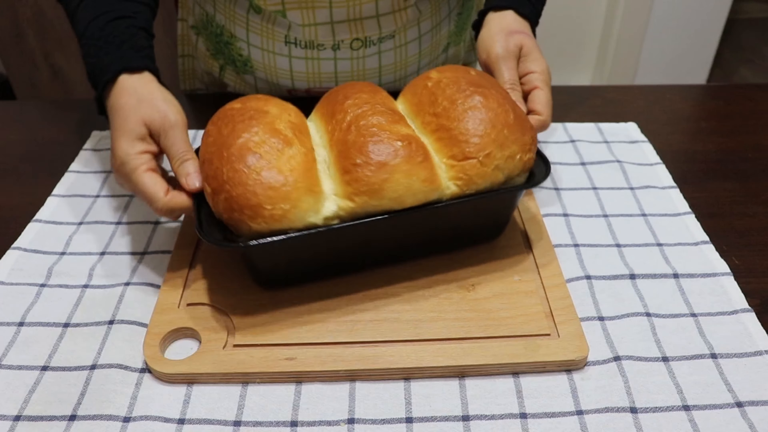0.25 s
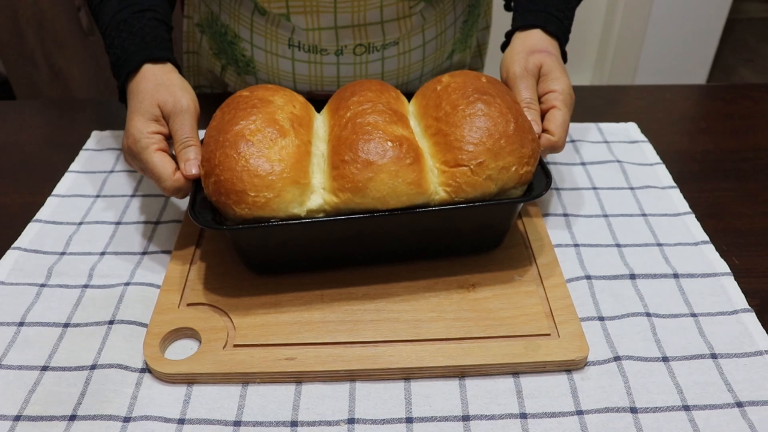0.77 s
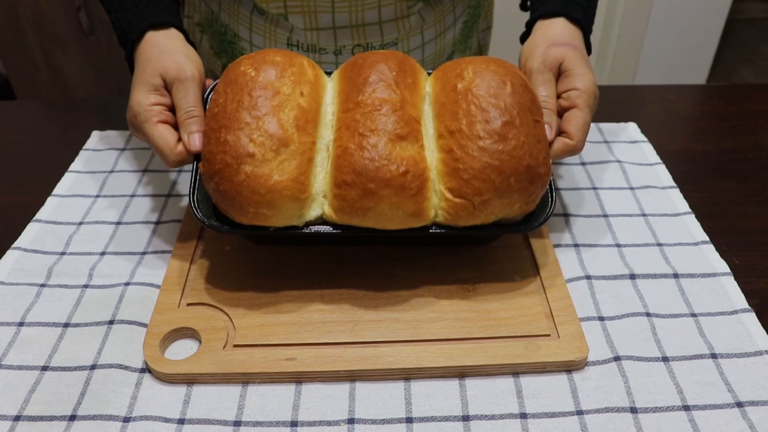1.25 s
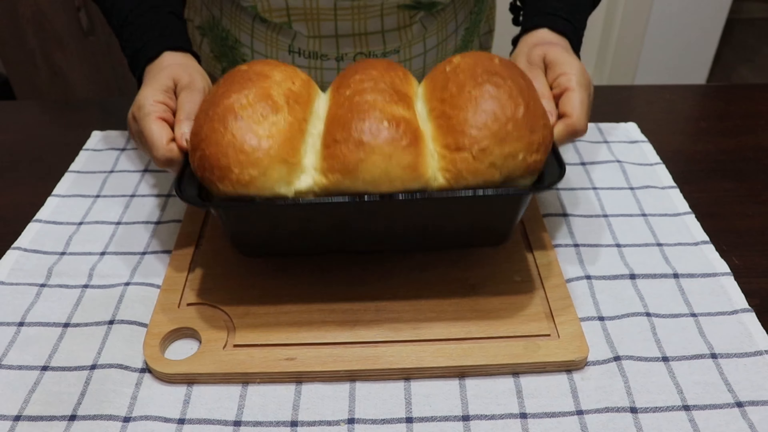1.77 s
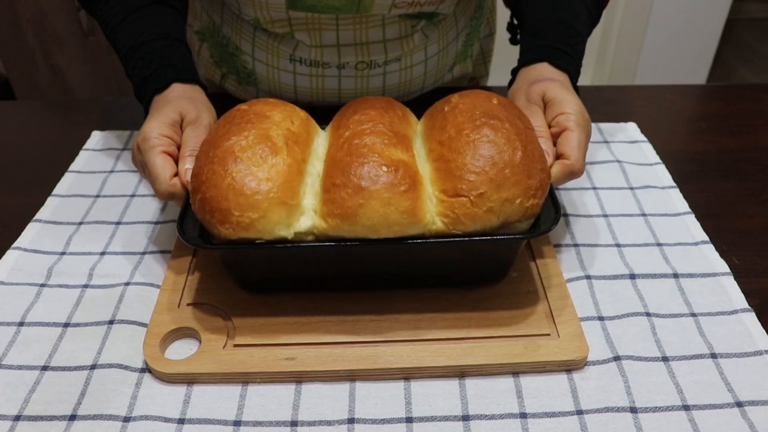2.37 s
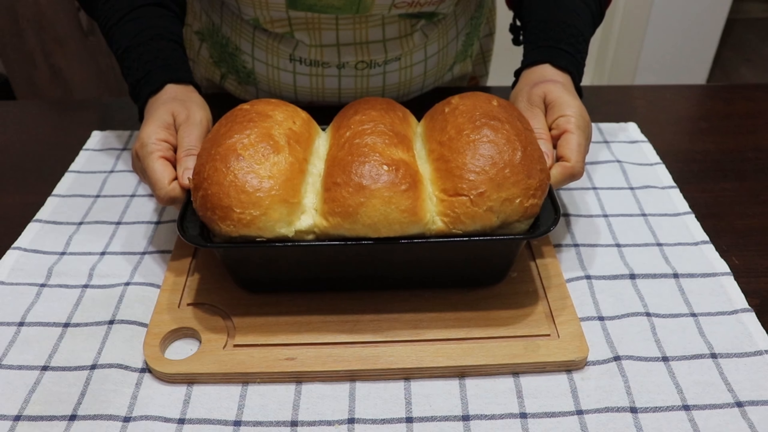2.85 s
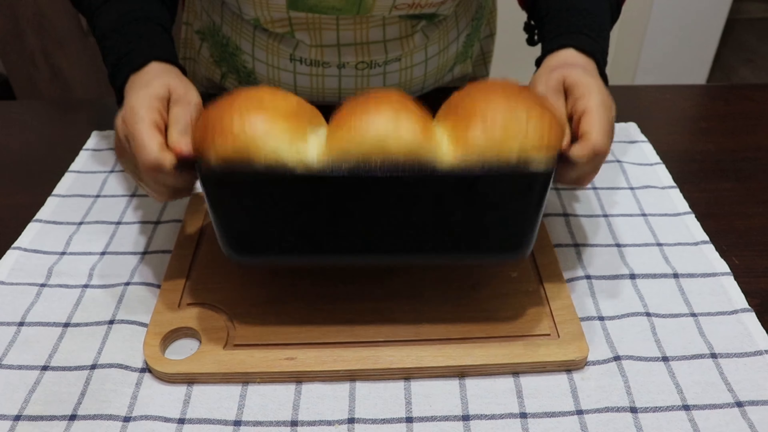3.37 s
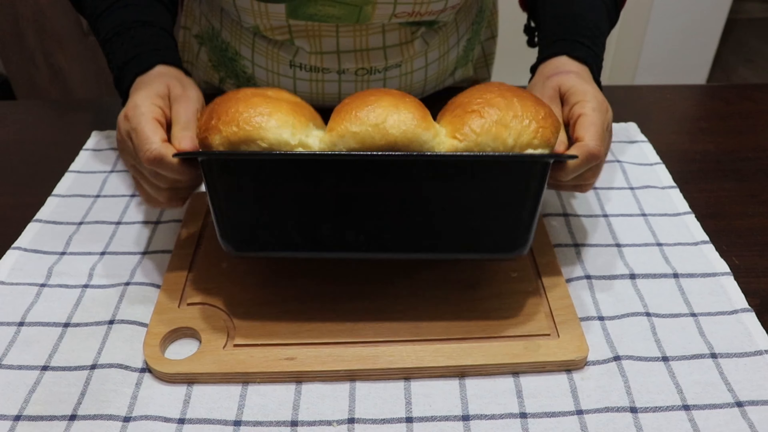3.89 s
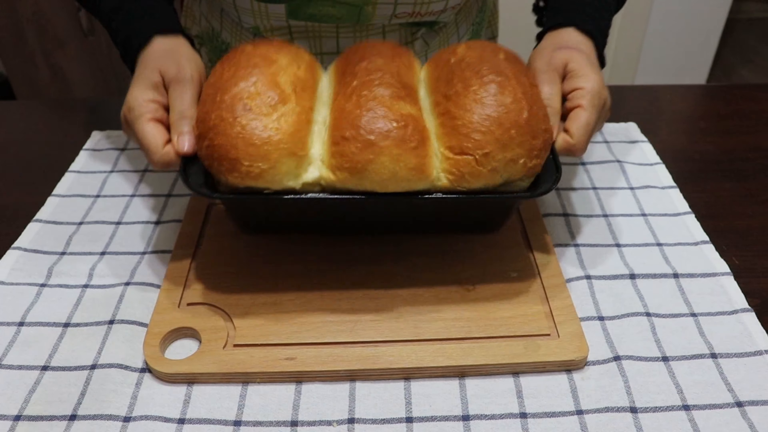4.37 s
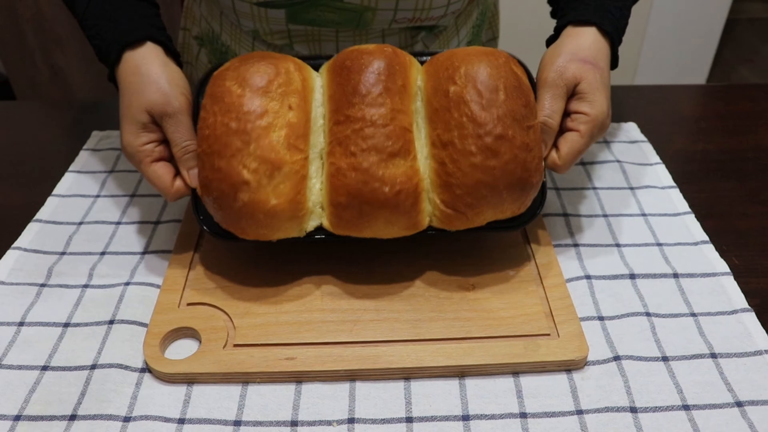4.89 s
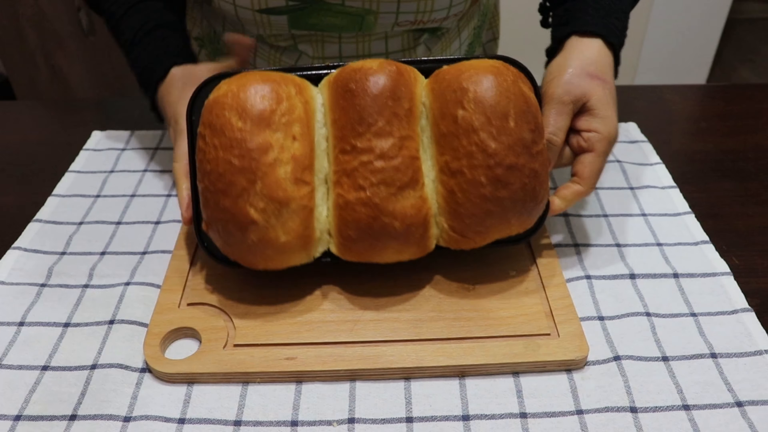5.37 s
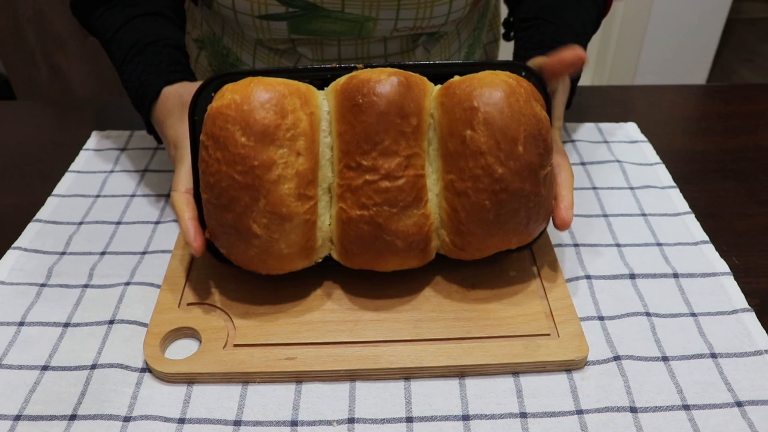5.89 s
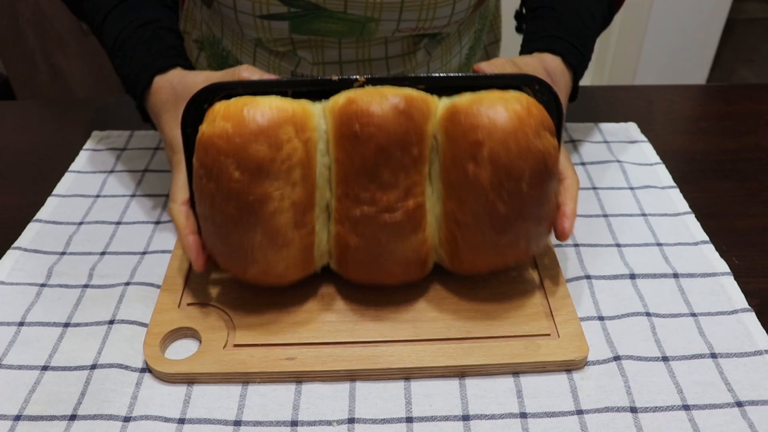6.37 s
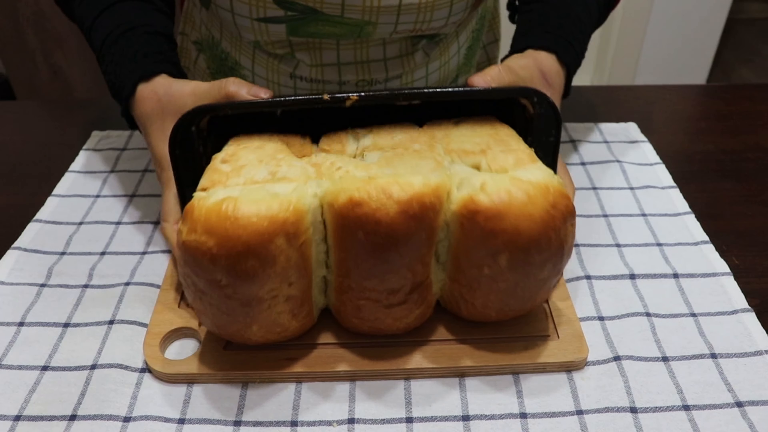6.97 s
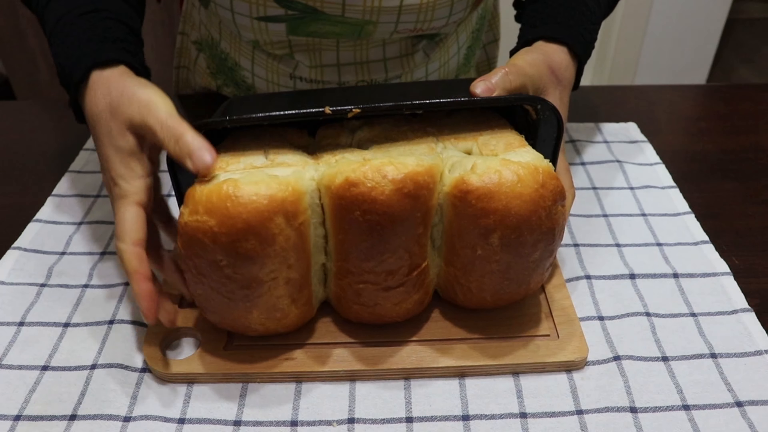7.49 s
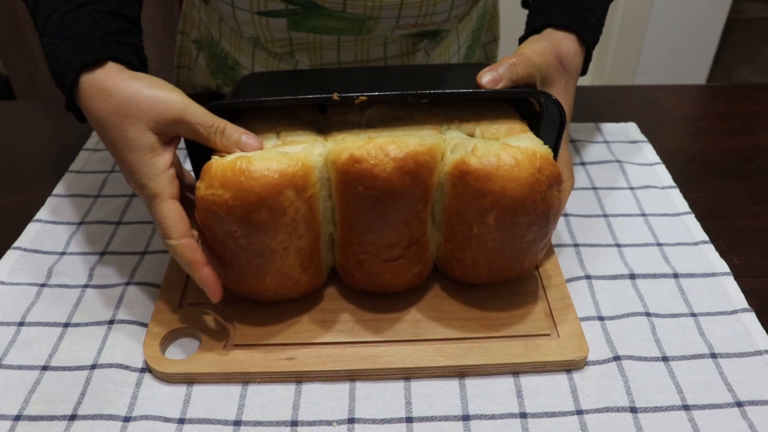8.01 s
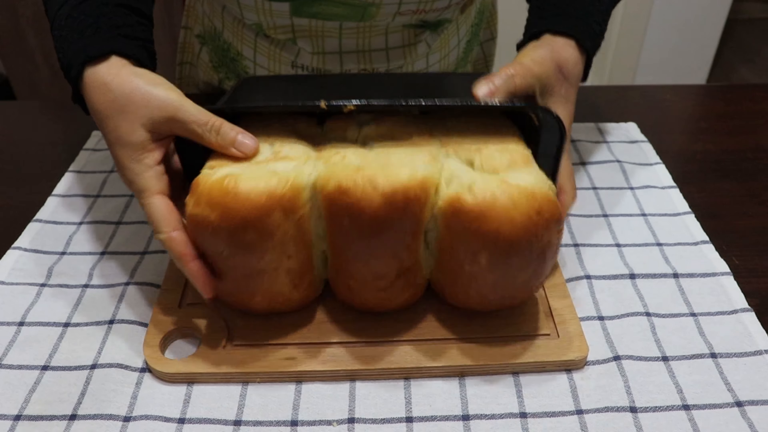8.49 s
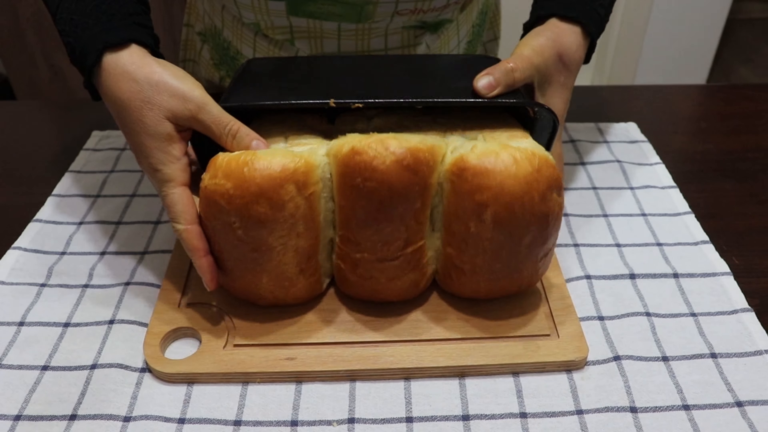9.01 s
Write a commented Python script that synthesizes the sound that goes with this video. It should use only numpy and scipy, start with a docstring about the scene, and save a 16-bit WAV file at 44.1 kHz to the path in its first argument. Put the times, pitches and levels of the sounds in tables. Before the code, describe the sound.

A baking pan knocks loudly on wood four times, ringing through a hard-walled kitchen, before bread slips out with dry, woody, metallic rubs.

```python
"""Loaf knocked out of its pan

A loaf pan is set down and knocked four times on a wooden board in a quiet, hard-walled kitchen, then tipped;
the crust slips out in short strokes and the pan is dragged off the loaf. Contact pulses and random slips
drive damped modes; shaped noise makes echoes and room tone. The blows overload a small stereo
microphone, whose gain control ducks and recovers while the room rings on."""
import sys
import numpy as np
from scipy import signal
from scipy.fft import rfft, irfft, next_fast_len
from scipy.io import wavfile
from scipy.ndimage import uniform_filter1d

SR = 44100
rng = np.random.default_rng(int(sys.argv[2]) if len(sys.argv) > 2 else 0)


def store_pcm(level_fs):
    """Save levels as 16-bit WAV."""
    pcm = np.round(np.clip(level_fs, -1, 1) * 32767).astype(np.int16)
    wavfile.write(sys.argv[1], SR, np.atleast_2d(pcm).T)


N = 407925
PAD = next_fast_len(N + SR)
GRID_HZ = np.maximum(np.arange(PAD // 2 + 1) * SR / PAD, 1)


def from_db(db):
    """Amplitude factor of a level in dB."""
    return 10 ** (np.asarray(db) / 20)


def rms_one(x):
    """Scales x to an rms of 1."""
    return x / np.sqrt(np.mean(x ** 2) + 1e-20)


def at_hz(points, hz):
    """Reads a (Hz, value) table, linear in log frequency."""
    points = np.array(points)
    return np.interp(np.log(hz), np.log(points[:, 0]), points[:, 1])


def colour(x, spectrum):
    """Shapes x by a (Hz, dB) table."""
    return irfft(rfft(x, PAD) * from_db(at_hz(spectrum, GRID_HZ)), PAD)[..., :x.shape[-1]]


def pair(mid, side, likeness):
    """Left and right from two unrelated signals, alike as the (Hz, likeness) table says."""
    alike = np.clip(at_hz(likeness, GRID_HZ), -1, 1)
    common = np.sqrt(1 + alike) * rfft(mid, PAD)
    opposed = np.sqrt(1 - alike) * rfft(side, PAD) * [[1], [-1]]
    return irfft(common + opposed, PAD)[:, :len(mid)]


def ring(force, modes, damping=1):
    """A unit click sets each mode ringing at its level; damping divides its t60."""
    out = 0
    for k, (hz, db, t60_s) in enumerate(modes):
        r = from_db(-60 * damping / (t60_s * SR))
        w = 2 * np.pi * hz / SR
        b, a = [0, from_db(db) * np.sin(w)], [1, -2 * r * np.cos(w), r * r]
        out = out + (-1) ** k * signal.lfilter(b, a, force + 1e-18)  # alternating polarity
    return out


# pan meets board: [start_s, table_db, board_db, base_db, walls_db, rim_db, contact_brightness_hz, rattle_db]
BLOWS = [(1.406, -32, -53, -41, -43, -58, 1500, -21.5), (2.047, 7, 11.5, 12, 15, 11, 6500, 2),
         (2.054, -17, 5.5, 5.5, -13, -17, 6000, -12), (2.3926, 5, 15, 14, 17, 15, 8200, 2.5),
         (2.42, -17, 1.5, 8.5, -2, -7, 4000, -2), (3.3222, -27, -23, -40, -43.5, -35.5, 3030, -13.5),
         (3.6622, 12.5, 8, 5.5, 19.5, 17, 2510, -5.5), (4.8661, 10.5, 15, 13.5, 19.5, 19, 3970, -1),
         (5.039, -22, -20.5, -1.5, -3.5, -13, 3020, -11), (5.327, -37.5, -39, -29, -48, -46, 6000, -4),
         (5.79, -40, -34, -24.5, -36, -29.5, 6000, -4), (5.856, -56, -53, -55, -58, -33, 5000, -8),
         (5.879, -58, -45, -37, -42, -35.5, 5000, -2), (6.752, -57, -41, -50, -34, -31.5, 8000, 2),
         (7.402, -16, -10.5, -23, -13.5, -24.5, 1800, 5), (7.755, -54, -43, -60, -36, -42, 2500, -6),
         (8.7305, -23, -15, -10.5, -9.5, -16, 2200, -30)]
# modes, each [pitch_hz, level_db, t60_s at damping 1]; all damped by hands and loaf
# table top
TABLE_MODES = [(136, 0, 0.077), (170.1, -3, 0.13), (210.4, 2, 0.088), (278.3, -0.5, 0.11)]
# wooden board
BOARD_MODES = [(317.6, -3, 0.16), (393.6, 1.5, 0.071), (421, -9, 0.014)]
# pan base
BASE_MODES = [(540.6, -1, 0.044), (665, 1, 0.03), (822, -4.5, 0.04)]
# pan walls
WALL_MODES = [(923, -3, 0.052), (1185, 1, 0.03), (1388, -1, 0.028), (1655, -4, 0.021)]
# pan rim
RIM_MODES = [(2084, -2, 0.042), (2424, -2.5, 0.046), (2824, -2.5, 0.028), (3355, -3, 0.034),
             (3560, -3, 0.03), (4314, -8.5, 0.041), (4750, -9.5, .02), (5530, -6.5, 0.017),
             (6400, -10.5, 0.012), (7600, -10, 0.016), (8200, -9, 0.0072), (10500, -5, 0.0034)]
# free ends of the pan
HANDLE_MODES = [(2200, -3.5, 0.031), (3780, 10.5, 0.028), (5600, -9, 0.04)]
RATTLE_MS = 5.9  # decay constant of a 0 dB rattle
RATTLE_STRETCH = 0.92  # a stronger one lasts longer by this share of its dB


def knocks():
    """Each blow is one contact pulse with its own brightness; each ear also hears a rattle from its pan end."""
    force = np.zeros((5, 3, N))  # body; blow, left rattle, right rattle
    t = np.arange(900) / SR
    noises = rng.standard_normal((len(BLOWS), 2, len(t)))
    for (start_s, *parts_db, bright_hz, rattle_db), noise in zip(BLOWS, noises):
        decay_ms = RATTLE_MS * from_db(RATTLE_STRETCH * rattle_db)
        rattle = noise * np.exp(-t * 1000 / decay_ms)
        rattle = from_db(rattle_db) * rattle / np.sqrt(np.sum(rattle ** 2))
        contact = np.vstack([t == 0, rattle])
        lowpass = signal.butter(2, min(bright_hz, 18000), fs=SR, output="sos")
        filtered = signal.sosfilt(lowpass, contact)
        first = round(start_s * SR)
        force[:, :, first:first + len(t)] += from_db(parts_db)[:, None, None] * filtered
    table, board, base, walls, rim = force
    out = ring(walls, WALL_MODES, damping=2.63) + ring(rim, RIM_MODES, damping=4.32)
    out[1:] += from_db(-3.5) * ring(rim[1:], HANDLE_MODES, damping=2.84)  # the free ends rattle
    # heavy parts feel only the blow
    out[0] += (ring(table[0], TABLE_MODES, damping=2.25)
               + ring(board[0], BOARD_MODES, damping=2.35)
               + ring(base[0], BASE_MODES, damping=1.6))
    return out


def grains(per_s, spread_db, clump_db):
    """Two unrelated streams of random slips of uneven size and sign, coming in clumps; rms 1."""
    sizes = from_db(spread_db * np.minimum(rng.exponential(1, (2, N)), 5))
    sizes = sizes * rng.choice([-1, 1], (2, N))
    knots = np.arange(N // 500 + 2)  # one per 500 samples
    clumps = np.interp(np.arange(N) / 500, knots, rng.standard_normal(len(knots)))
    slips = rng.random((2, N)) < per_s / SR
    return rms_one(sizes * from_db(clump_db * clumps) * slips)


# rubbing strokes: [full_s, rise_ms, hold_ms, fall_ms, board_db, walls_db, rim_db, handles_db, hiss_db]
RUB_STROKES = [(0.038, 17, 3.5, 130, -45, -49, -55, -67, -51),
               (0.225, 130, 16, 117, -44, -50.5, -52, -52.5, -45.5),
               (0.37, 90, 16, 120, -49, -58, -61, -62, -58), (1.09, 84, 34, 98, -49.5, -66, -62, -63, -59),
               (1.18, 130, 17, 140, -43, -50, -61, -62, -72),
               (1.409, 18, 15, 87, -45, -59.5, -63, -66, -74), (1.735, 30, 8, 36, -56, -59, -64, -67, -65),
               (3.235, 60, 14, 49, -61, -58.5, -62, -67, -57),
               (3.324, 13, 36, 40, -42, -63.5, -51.5, -47.5, -58),
               (5.221, 40, 14, 100, -57, -44, -60.5, -65.5, -64),
               (5.29, 50, 13, 50, -49, -59, -65, -70, -52.5),
               (5.343, 30, 4.2, 63, -34, -41, -49, -70, -49.5),
               (5.54, 89, 60, 160, -62, -63, -60, -65, -63),
               (5.796, 58, 7.4, 63, -42, -51, -61, -51, -46.5), (5.86, 63, 19, 44, -41, -58, -60, -63, -60),
               (6.01, 120, 90, 100, -72, -73.5, -71, -62.5, -68),
               (6.27, 56, 47, 70, -60, -61, -61.5, -70, -58),
               (6.365, 22, 10.5, 45, -48, -53, -53, -62, -51.5),
               (6.648, 15, 23, 97, -54, -62, -41, -48, -34), (6.91, 45, 20, 19, -63, -55, -50, -66, -42),
               (6.984, 42, 21.5, 39, -50, -52, -54, -64, -37),
               (7.055, 25, 6, 37, -48, -49.5, -56, -75, -62), (7.13, 50, 13, 39, -50, -48, -46.5, -60, -49),
               (7.228, 54, 14, 130, -58, -54, -51.5, -70, -50.5),
               (7.33, 120, 38, 60, -54, -56.5, -54.5, -71, -66),
               (7.424, 30, 22, 114, -30.5, -39, -50, -68, -58),
               (7.55, 46, 25, 125, -46.5, -46, -46.5, -67, -55),
               (7.635, 84, 10, 35, -58, -48, -46.5, -66, -59), (7.762, 20, 17, 90, -65, -51, -53, -71, -69),
               (7.875, 89, 23, 180, -31, -39.5, -39.5, -56, -42.5),
               (7.961, 124, 87, 240, -29, -36.5, -38, -51, -44),
               (8.024, 37, 7, 22, -51, -32.5, -61, -65, -62), (8.28, 60, 12, 27, -54, -54, -53, -70, -64),
               (8.53, 20, 39, 82, -23, -38, -57, -65, -60), (8.522, 51, 27, 73, -36, -32, -34, -44, -33),
               (8.65, 110, 44, 71, -39, -45.5, -62, -67, -57),
               (8.739, 9.1, 10, 160, -32.5, -29.5, -40.5, -68, -50),
               (8.969, 63, 18, 440, -32.5, -36.5, -35.5, -45, -49),
               (9.04, 94, 8.7, 55, -25.5, -54, -55, -59, -61),
               (9.13, 87, 140, 90, -27.5, -38.5, -39.5, -52, -56)]
# crust and skin hiss spectrum: [pitch_hz, relative_level_db]
CRUST_SPECTRUM = [(700, -9), (1500, -9), (2500, -5.5), (4700, -10.5), (8300, -11.5), (11000, -17.5),
                  (15800, -23)]
# left-right likeness of the rubbing: [pitch_hz, likeness]
RUB_WIDTH = [(60, 0.18), (180, 1), (550, 0.91), (1650, 0.62), (4970, 0.43), (15000, 0.0)]
SWELL_DB = 20  # change made in one rise_ms or fall_ms
TIPPED_S = 6.5  # the loaf is tipped out
TABLE_FULL_DB, TABLE_EMPTY_DB = -4, -7  # table gain in rubbing; the full pan weighs on it more


def rubs():
    """Slips shake board coarsely, pan finely; dry crust and skin hiss, across the whole width of the loaf."""
    t, power = np.arange(N) / SR, np.zeros((5, N))
    for full_s, rise_ms, hold_ms, fall_ms, *parts_db in RUB_STROKES:
        part = slice(max(round((full_s - .4) * SR), 0), round((full_s + 1) * SR))
        ms = 1000 * (t[part] - full_s)
        rising = np.maximum(-ms / max(rise_ms, 1), 0)
        falling = np.maximum(ms - max(hold_ms, 0), 0) / max(fall_ms, 1)
        swell = from_db(-SWELL_DB * (rising + falling))
        power[:, part] += (from_db(parts_db)[:, None] * swell) ** 2
    board, walls, rim, handles, hiss = np.sqrt(power)
    coarse = grains(500, spread_db=3.5, clump_db=0.0)
    fine = grains(2500, spread_db=1.0, clump_db=1.5)
    table_gain = from_db(np.where(t < TIPPED_S, TABLE_FULL_DB, TABLE_EMPTY_DB))
    wood = ring(coarse, BOARD_MODES, damping=0.93)
    wood = rms_one(wood + table_gain * ring(coarse, TABLE_MODES, damping=0.72))
    metal = walls * rms_one(ring(fine, BASE_MODES + WALL_MODES, damping=1.7))
    metal += rim * rms_one(ring(fine, RIM_MODES, damping=3.5))
    metal += handles * rms_one(ring(fine[::-1], HANDLE_MODES))
    crust = rms_one(colour(grains(12000, spread_db=1.5, clump_db=2.0), CRUST_SPECTRUM))
    return pair(*(board * wood + metal + hiss * crust), RUB_WIDTH)


# echo decay: [pitch_hz, t60_s]
ECHO_T60 = [(100, 0.99), (250, 0.9), (700, 0.53), (1500, 0.66), (3000, 0.44), (6000, 0.42), (12000, 0.28)]
# echo spectrum: [pitch_hz, relative_level_db]
ECHO_SPECTRUM = [(60, -22), (100, -24.5), (130, -7), (400, -8), (1000, -3.5), (3000, -8), (8000, -2.5),
                 (16000, -16.5)]
# left-right likeness of the echoes: [pitch_hz, likeness]
ECHO_WIDTH = [(100, 0.96), (400, 0.87), (1000, 0.43), (3000, -0.058), (16000, -0.88)]
# lowest standing waves: [pitch_hz, relative_level_db, t60_s]
STANDING_WAVES = [(127, 2, 0.84), (152.5, 4.5, 0.71), (175.9, -5.5, 1), (225.1, -5.5, 0.95),
                  (267.5, -1, 0.77), (369.6, -3, 1), (399.4, -1, 0.49)]


def kitchen(x):
    """Echoes as noise dying band by band, with the lowest standing waves on top."""
    t = np.arange(SR) / SR
    edges_hz = 60 * 2 ** np.arange(0, 8.4, .5)
    white = [colour(pair(*two, ECHO_WIDTH), ECHO_SPECTRUM) for two in rng.standard_normal((2, 2, SR))]
    tail = from_db(-28.0) * ring(1. * (t == 0), STANDING_WAVES)
    for k, (low_hz, high_hz) in enumerate(zip(edges_hz, edges_hz[1:])):
        bandpass = signal.butter(2, [low_hz, high_hz], "band", fs=SR, output="sos")
        band = signal.sosfilt(bandpass, white[k % 2])  # neighbouring bands unrelated
        t60_s = at_hz(ECHO_T60, np.sqrt(low_hz * high_hz))
        tail = tail + band * from_db(-60 * t / t60_s)
    tail = tail * (1 - np.exp(-t / 0.0029))  # echoes build up
    return irfft(rfft(tail, PAD) * rfft(x, PAD), PAD)[:, :N]


# room tone spectrum: [pitch_hz, relative_level_db]
AIR_SPECTRUM = [(15, -51), (25, -11.5), (70, -10.5), (170, -12.5), (200, -9.5), (437, -16), (729, -18.5),
                (812, -15), (929, -18.5), (1180, -19.5), (1930, -21), (6310, -26.5), (15800, -36)]
# left-right likeness of the room tone: [pitch_hz, likeness]
AIR_WIDTH = [(60, 0.85), (180, 0.73), (550, 0.19), (1650, 0.033), (4970, 0.01), (15000, 0.077)]
AIR_DB = -50  # rms


def room_tone():
    """Steady stereo noise, shaped by the room tone spectrum."""
    noise = pair(*rng.standard_normal((2, N)), AIR_WIDTH)
    return from_db(AIR_DB) * rms_one(colour(noise, AIR_SPECTRUM))


RIGHT_LAG_SAMPLES = 2  # right port is a little further


def scene():
    """Direct knocks and rubs at the two ports, plus their echoes and the room tone."""
    (blows, *rattles), strokes = knocks(), rubs()
    late = np.roll(blows, RIGHT_LAG_SAMPLES)
    air = room_tone()
    no_bass = signal.butter(4, 108, "high", fs=SR, output="sos")  # small bodies radiate no deep bass
    near = signal.sosfilt(no_bass, np.array([blows, late]) + rattles + strokes)
    echoes = kitchen(signal.sosfilt(no_bass, blows + strokes[0]))
    return near * from_db([[.2], [-.2]]) + from_db(-35.5) * echoes + air


SILENT_UNTIL_S = .036  # silent until then
CUTOFF_HZ = 16000
THRESHOLD_DB, CUT_PER_DB, MAX_CUT_DB = -13, 0.66, 22
RELEASE_DB_PER_S, ATTACK_S = 72.6, 0.0021


def record(dry):
    """Gain drops for what exceeds a threshold, too late for the blow itself, which clips; then it climbs back."""
    climb_db = RELEASE_DB_PER_S * np.arange(N) / SR
    power = uniform_filter1d(np.mean(dry ** 2, axis=0), 300, origin=149)  # over the last 300 samples
    level_db = 10 * np.log10(power + 1e-12)
    cut_db = np.clip(CUT_PER_DB * (level_db - THRESHOLD_DB), 0, MAX_CUT_DB)
    cut_db = np.maximum.accumulate(cut_db + climb_db) - climb_db  # slow release
    r = np.exp(-1 / (ATTACK_S * SR))
    cut_db = signal.lfilter([(1 - r) ** 2], [1, -2 * r, r * r], cut_db)  # late attack
    own_hiss = from_db(-74) * rng.standard_normal(dry.shape)  # converter noise, behind the gain stage
    clipped = np.clip(dry * from_db(-cut_db) + own_hiss, -1, 1)
    clipped = clipped * (np.arange(N) > SILENT_UNTIL_S * SR)
    lowpass = signal.cheby2(12, 40, CUTOFF_HZ + 100, fs=SR, output="sos")
    return np.clip(signal.sosfilt(lowpass, clipped), -1, 1)


dry = scene()
out = record(dry)
store_pcm(out)
```